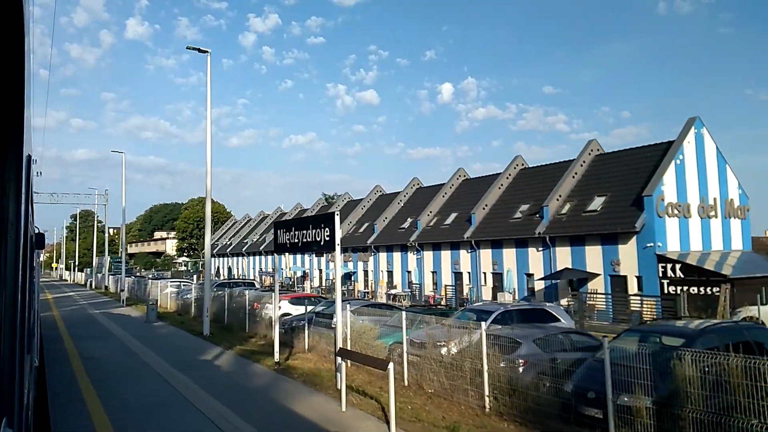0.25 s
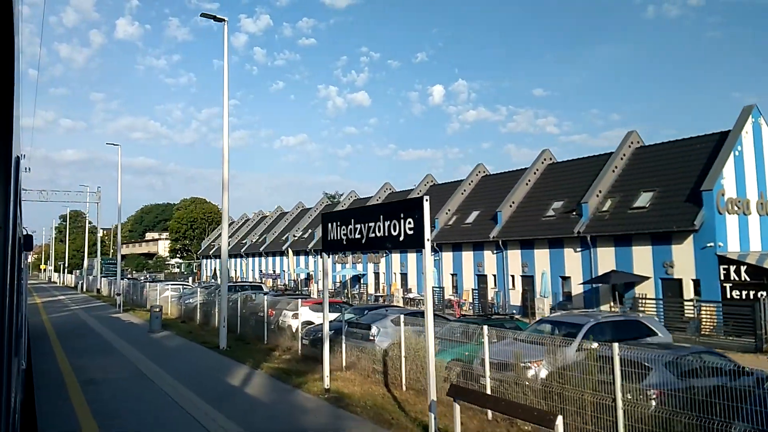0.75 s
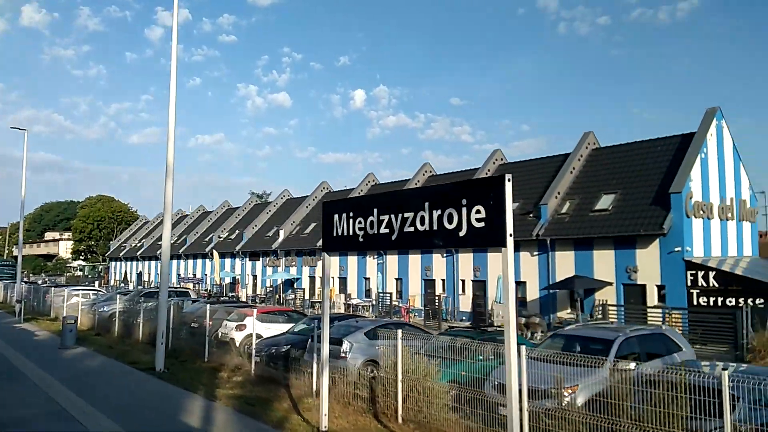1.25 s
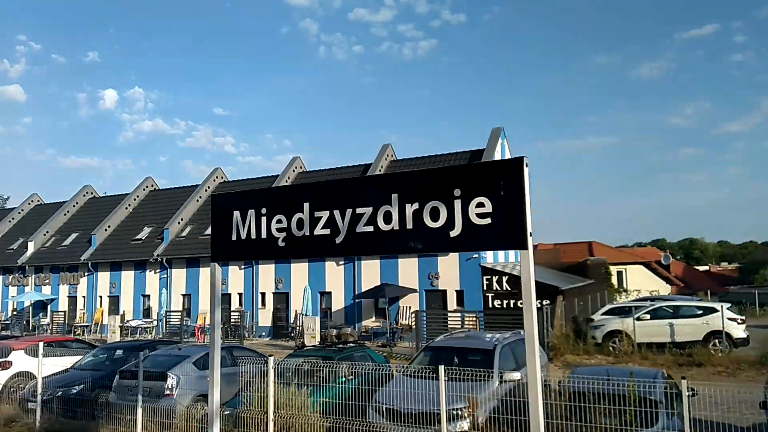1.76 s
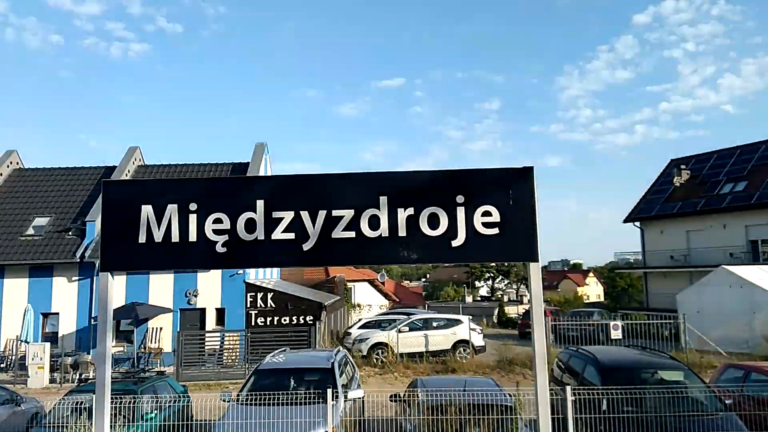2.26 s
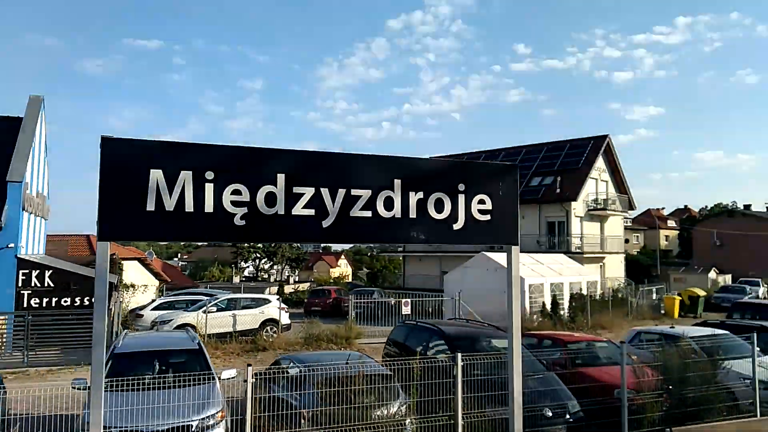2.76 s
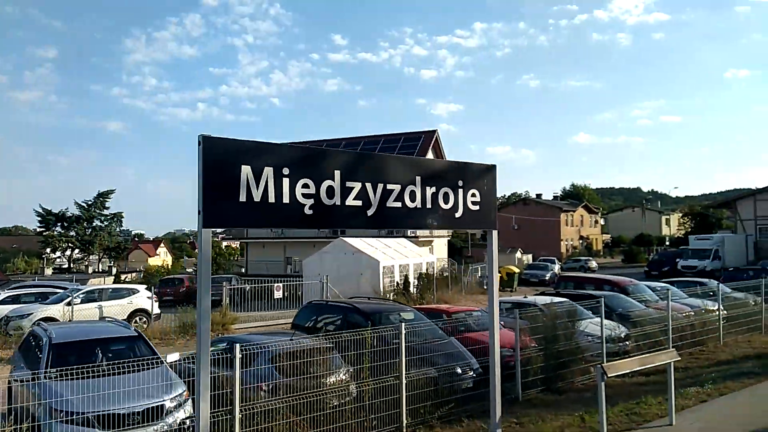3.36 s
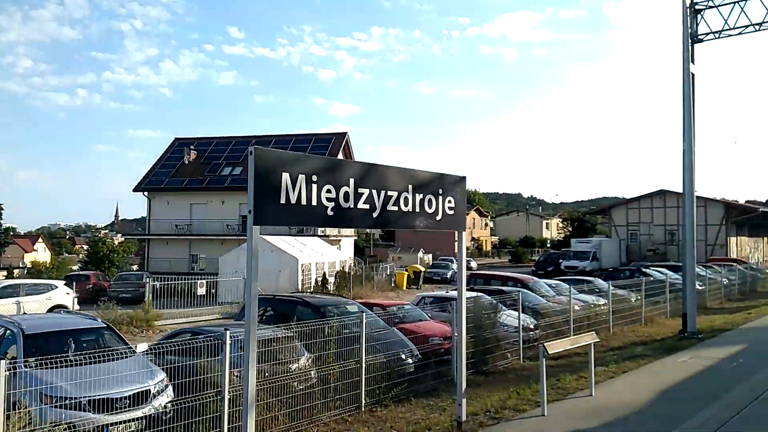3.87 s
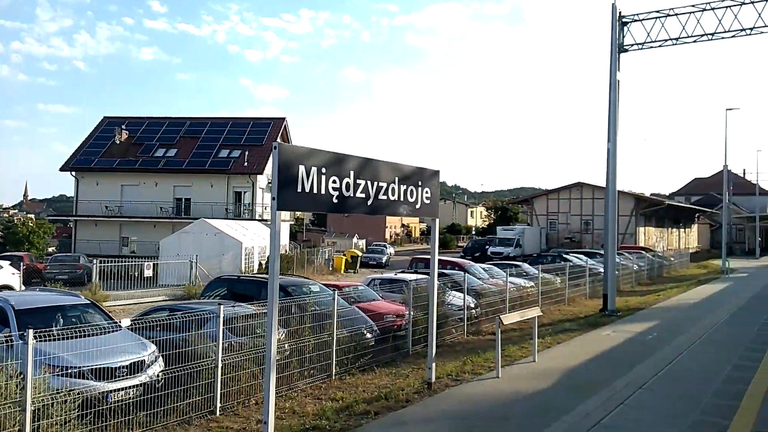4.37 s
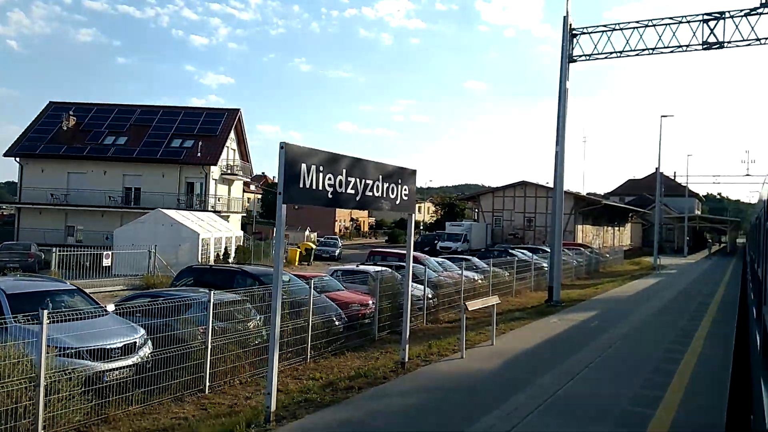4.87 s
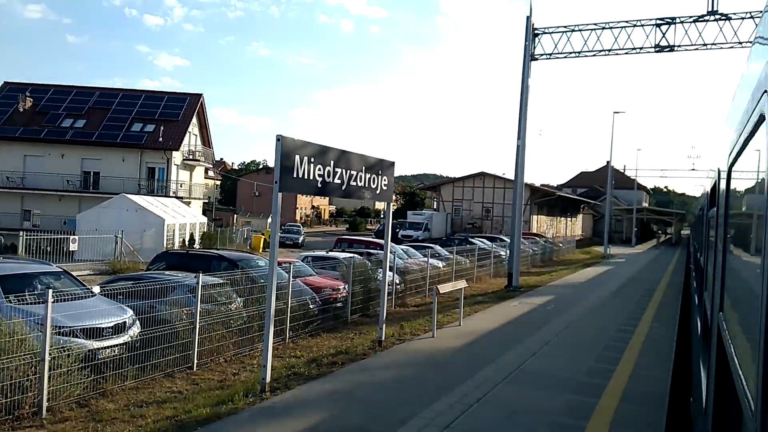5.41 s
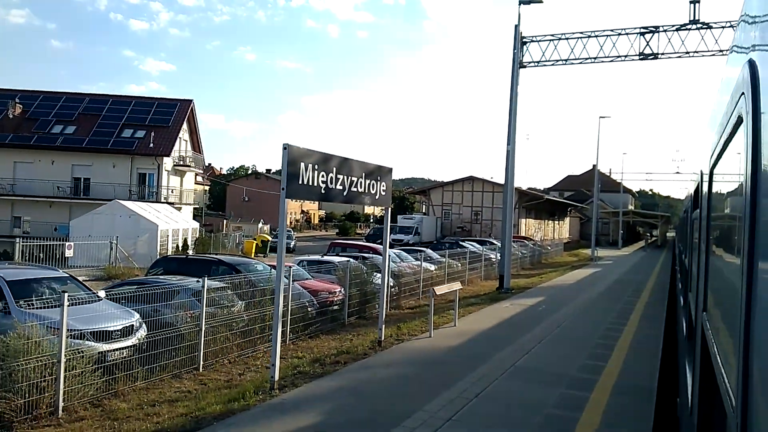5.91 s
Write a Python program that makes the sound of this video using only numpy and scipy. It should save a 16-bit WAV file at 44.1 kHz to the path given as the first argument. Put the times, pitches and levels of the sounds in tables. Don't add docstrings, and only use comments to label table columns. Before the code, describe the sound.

From an open window of a slowing passenger train, rolling roar and low rumble dominate at first, with steel clinks and short hissing brake grabs over a thin, high squeal. The roar fades while the squeal swells into a piercing, wavering scream, flattened by the overloaded phone microphones, still sounding at the end.

```python
import sys
import numpy as np
from scipy import signal
from scipy.fft import next_fast_len
from scipy.io import wavfile
from scipy.ndimage import uniform_filter1d

SR = 44100
rng = np.random.default_rng(int(sys.argv[2]) if len(sys.argv) > 2 else 0)


def waveform_to_disk(signal):
    frames = np.transpose(np.atleast_2d(signal))
    scaled = np.clip(frames, -1, 1) * 32767
    samples = np.round(scaled).astype(np.int16)
    wavfile.write(sys.argv[1], SR, samples)


def gain_from_decibels(decibels):
    exponent = np.asarray(decibels, float) / 20
    return 10 ** exponent


N = 271052
CEILING_DB = -11


def evened(x):
    return x / np.sqrt(np.mean(x ** 2) + 1e-20)


def along(rows, t):
    s, *columns = np.transpose(rows)
    return np.array([np.interp(t, s, c) for c in columns])


def grid(size):
    hop = size // 4
    return np.arange(N // hop + 5) * hop / SR, np.fft.rfftfreq(size, 1 / SR)


def drift(span):
    x = rng.standard_normal((N, 2)).T
    for _ in range(2):
        x = uniform_filter1d(x, span, axis=1)
    return evened(x)


def bumps(events, value):
    t, out = np.arange(N) / SR, np.zeros((2, N))
    for (s, side, _, length), height in zip(events, value):
        near = slice(max(int((s - 2 * length) * SR), 0), int((s + 2 * length) * SR))
        out[int(round(side)), near] += height * np.exp(-np.log(16) * ((t[near] - s) / length) ** 2)
    return out


def noise(gain, same, size):
    a, b, c, d = rng.standard_normal((gain.shape[2], gain.shape[1], 4)).T
    same = np.clip(same, 0, 1)
    left = a + 1j * b
    right = same * left + np.sqrt(1 - same ** 2) * (c + 1j * d)
    z = np.array([left, right]) * gain
    return signal.istft(z, nperseg=size, noverlap=size * 3 // 4)[1][:, :N]


def bed(colour, run, same, patchy_db, flicker_db, edge_db, lift_db, size):
    t, hz = grid(size)
    f, *sides = np.transpose(colour)
    shape_db = np.array([np.interp(np.log(hz + 1), np.log(f), side) for side in sides])
    shape_db -= edge_db * np.maximum(np.log2((hz + 1) / f[-1]), 0)
    shape_db -= edge_db * np.maximum(np.log2(f[0] / (hz + 1)), 0)
    patches = rng.standard_normal((len(t), len(hz))).T
    patches = evened(uniform_filter1d(uniform_filter1d(patches, 12, axis=0), 10, axis=1))
    flicker = evened(uniform_filter1d(rng.standard_normal(len(t)), 3))
    gain_db = shape_db[:, :, None] + patchy_db * patches + flicker_db * flicker
    level_db, pan_db = run
    sides_db = level_db + lift_db + np.array([pan_db, -pan_db]) / 2
    return evened(noise(gain_from_decibels(gain_db), same, size)) * gain_from_decibels(sides_db)


def running_gear(start_db, halving_loss_db, turned_db, turned_pan_db):
    # t/s, speed/0-1 of line speed, phone turned back along the train/0-1
    ride = [
        (0, 0.97, 0),
        (1.5, 0.87, 0),
        (2.6, 0.67, 0.06),
        (3.4, .58, 0.34),
        (4.6, .46, 0.12),
        (5.3, 0.45, 0.59),
        (6.15, 0.35, .99),
    ]
    speed, turned = along(ride, np.arange(N) / SR)
    level_db = start_db + halving_loss_db * np.log2(np.maximum(speed, 0.05)) + turned_db * turned
    return level_db, turned_pan_db * turned


def rumble():
    # f/Hz, left level/dB per Hz, right level/dB per Hz
    colour = [(25, -26, -24), (52, -2.5, 2.5), (95.7, 11, 5), (153, 0.5, -5.5), (263, -1, -10.5),
              (397, -2.5, -13.5), (570, -20, -21.5), (844, -16.5, -22)]
    run = running_gear(start_db=-36.5, halving_loss_db=0, turned_db=-8.5, turned_pan_db=0)
    hz = grid(size=2048)[1][:, None]
    alike = 0.9 - 0.5 / (1 + (hz / 45) ** 4)
    return bed(colour, run, alike, patchy_db=1.3, flicker_db=1.7, edge_db=6.5, lift_db=1.0, size=2048)


def rolling_roar():
    # f/Hz, left level/dB per Hz, right level/dB per Hz
    colour = [(234, -1, -5.5), (510, -6.5, -13.5), (875, -3.5, -11), (1430, -2, -16.5), (1975, 0.9, -21),
              (2730, -9, -23.5), (3660, -15.5, -23.5), (5260, -32.5, -65), (5820, -25, -26.5)]
    run = running_gear(start_db=-28, halving_loss_db=14.5, turned_db=6, turned_pan_db=-12)
    hz = grid(size=512)[1][:, None]
    alike = 1.03 / (1 + (hz / 1100) ** 2)
    roar = bed(colour, run, alike, patchy_db=0.9, flicker_db=0.42, edge_db=21, lift_db=4.0, size=512)
    roar[0] = np.roll(roar[0], 9)
    return roar


def rattles():
    # t/s, peak level/dB, t60/s
    bursts = [
        (0.1795, -39, 0.08),
        (0.3237, -36, 0.072),
        (0.4893, -40, 0.099),
        (0.5965, -31, 0.068),
        (0.7292, -36, 0.08),
        (1.3957, -29, 0.087),
        (1.5524, -29, 0.079),
        (1.555, -27, 0.024),
        (1.8542, -32, 0.08),
        (2.5052, -45, 0.08),
    ]
    # f/Hz, width/Hz, level/dB
    modes = [(5900, 640, -13), (7530, 570, 6), (8460, 460, -0.5), (11000, 1600, -6)]
    t = np.arange(N) / SR
    envelope = gain_from_decibels(-44.0 - 4.9 * t + 1.9 * drift(900)[0])
    for s, peak_db, t60 in bursts:
        attack = np.clip((t - s) / 0.003, 0, 1)
        envelope = envelope + gain_from_decibels(peak_db - 8.5 - 60 * np.maximum(t - s, 0) / t60) * attack
    frames, hz = grid(size=256)
    colour = sum(gain_from_decibels(db) / (1 + (2 * (hz - f_hz) / width) ** 2) for f_hz, width, db in modes)
    sides = gain_from_decibels(np.array([-8.5, 0]))[:, None, None]
    gain = colour[None, :, None] * sides * np.ones(len(frames))
    return evened(noise(gain, 0.14, size=256)) * envelope


def brake_rub():
    # f/Hz, left level/dB per Hz, right level/dB per Hz
    colour = [(1500, -8, -14), (2800, -1, -11), (3600, -4, -6), (4100, 0, 0), (4900, -2, -1),
              (5300, -12, -10), (6200, -13, -9), (7400, -15, -7), (8200, -15, -5), (9600, -12, -7),
              (10400, -16, -12), (12400, -12, -16), (14000, -15, -25)]
    # t/s, level/dB
    contact = [(0, -51.5), (.36, -49), (.4, -68), (1.2, -52.5), (2.1, -53.5), (2.42, -51), (2.55, -45),
               (3.4, -40.5), (4.4, -43), (5.3, -38.5), (5.68, -43.5), (5.85, -41.5), (6.05, -43),
               (6.15, -49)]
    # t/s, peak level/dB
    grabs = [
        (.5, -51),
        (.6, -56),
        (.77, -53),
        (.93, -51.5),
        (1.09, -64),
        (1.19, -66),
        (1.4, -56),
        (1.55, -47.5),
        (1.86, -48.5),
        (2.11, -50.5),
    ]
    rise_s, fall_db_per_s = 0.015, 120
    t = np.arange(N) / SR
    level = gain_from_decibels(along(contact, t)[0])
    for s, peak_db in grabs:
        swell = np.clip(1 + (t - s) / rise_s, 0, 1)
        level = level + gain_from_decibels(peak_db - fall_db_per_s * np.maximum(t - s, 0)) * swell
    run = 20 * np.log10(level), np.zeros(N)
    return bed(colour, run, same=0.041, patchy_db=2.0, flicker_db=0.0, edge_db=45, lift_db=9.5, size=512)


def partials(table, hz, mode_hz, spread, level_db):
    total = 0
    for multiple, left_db, right_db, blur in table:
        sides_db = np.array([left_db, right_db])[:, None, None]
        distance_hz = abs(hz[:, None] - multiple * mode_hz)
        total = total + gain_from_decibels(sides_db + level_db - spread / blur * distance_hz / 100)
    return total


def squeal():
    # t/s, left level/dB, right level/dB
    drive = [(0.0, -33, -38), (0.6, -28, -36), (0.9, -28.5, -37), (1.2, -24, -30.5), (1.5, -29.5, -33.5),
             (1.8, -25.5, -30), (2.4, -21.5, -24), (2.7, -21.5, -25), (3.0, -20.5, -27.5),
             (3.3, -15.5, -20), (3.6, -18, -14.5), (3.9, -16.5, -18.5), (4.4, -14, -17.5), (4.8, -20, -17),
             (5.2, -11.5, -18.5), (5.7, -19.5, -15), (6.0, -15.5, -10), (6.15, -20.5, -16)]
    # t/s, pitch fall-off/dB per 100 Hz, narrow core level/dB, overtone level/dB
    braking = [(0, 12.5, -7.5, -19.5), (1.5, 11, -3, -24.5), (2.4, 14.5, -6, -35), (3.0, 6.5, 3, -18),
               (3.8, 16.5, 4, -19), (4.5, 13.5, 5, -17.5), (5.0, 13.5, 4, -15), (5.6, 22, 6, -19.5),
               (6.15, 26.5, 15.5, -15.5)]
    # t/s, f/Hz
    disc_mode = [(0, 4500), (1.5, 4497), (2.5, 4485), (3.1, 4464), (3.9, 4464), (4.6, 4456), (5.1, 4450),
                 (6.15, 4456)]
    # multiple of the disc mode, left level/dB, right level/dB, blur factor
    half_mode = [
        (.5, 0, -9, 0.49),
        (.5, -4.5, -17, 4.45),
        (1.5, -14, -10.5, 1.27),
        (1.5, -29, -17, 8.7),
    ]
    overtones = [
        (2, -13, -2.5, 1.96),
        (2, -27, -13, 5),
        (3, -16.5, -24.5, 1.4),
        (3, -23, -30, 6.9),
    ]
    # t/s, level/dB
    half_growth = [(0, -69), (2.8, -57), (3.6, -43.5), (3.95, -40.5), (4.3, -45.5), (4.75, -41.5),
                   (5.02, -36.5), (5.45, -35), (5.65, -39), (6.1, -37), (6.15, -41)]
    # t/s, microphone (0 left, 1 right), level over the ceiling/dB, length/s
    surges = [(3.148, 0, 13, 0.0067), (3.464, 0, 18, 0.0083), (4.077, 0, 11, 0.014), (4.27, 1, 6, 0.012),
              (4.391, 0, 7, 0.0051), (4.419, 1, 10, 0.0092), (4.549, 1, 10, 0.013), (4.64, 0, 5, 0.027),
              (4.677, 1, 9.5, 0.014), (4.772, 0, 10, 0.013), (4.773, 1, 13, 0.019), (4.86, 0, 8, 0.045),
              (4.931, 0, 11, 0.067), (5.004, 1, 9.5, 0.034), (5.086, 1, 9.5, 0.077), (5.144, 0, 19, 0.017),
              (5.171, 1, 16.5, 0.016), (5.255, 1, 5, 0.086), (5.257, 0, 17, 0.067), (5.345, 1, 13, 0.027),
              (5.36, 0, 5.5, 0.054), (5.401, 1, 10.5, 0.056), (5.457, 0, 13, 0.014), (5.512, 1, 10, 0.031),
              (5.552, 0, 16, 0.053), (5.671, 1, 17.5, 0.085), (5.777, 0, 15.5, 0.053), (5.912, 0, 6.5, 0.1),
              (6.027, 0, 9, 0.03), (6.112, 1, 16, 0.021)]
    # t/s, microphone (0 left, 1 right), depth/dB, length/s
    lulls = [(0.04, 0, 15, 0.024), (2.266, 1, 7, 0.043), (2.423, 0, 12, 0.018), (2.477, 1, 10, 0.011),
             (3.066, 0, 4, 0.015), (3.336, 0, 3, 0.036), (3.785, 0, 13, 0.013), (4.001, 0, 20, 0.033),
             (4.204, 1, 8, 0.0087), (4.596, 0, 13, 0.017), (4.642, 1, 18, 0.0069), (4.738, 0, 18, 0.0097),
             (4.972, 1, 11, 0.02), (5.283, 1, 6, 0.016), (5.316, 0, 7, 0.042), (5.664, 0, 20, 0.005),
             (4.872, 0, 11, .006), (5.008, 0, 8, .008), (5.05, 0, 8, 0.0073), (5.088, 0, 13, 0.0074),
             (5.635, 0, 12, .008), (5.865, 0, 8, 0.0091), (6.061, 0, 14, .014), (5.111, 1, 11, 0.0069),
             (5.379, 1, 8, .006), (5.479, 1, 12, .007), (5.597, 1, 14, 0.011), (5.7, 1, 7, 0.0057),
             (5.861, 1, 12, .012), (2.425, 1, 9, 0.022)]
    surge_db, lull_db = np.array(surges)[:, 2], np.array(lulls)[:, 2]

    frames, hz = grid(size=4096)
    mode_hz = along(disc_mode, frames)[0]
    spread, core_db, over_db = along(braking, frames)
    main = partials([(1, 0, 0, 1)], hz, mode_hz, spread, 0)
    main = main + partials([(1, 0, 0, 0.25)], hz, mode_hz, spread, core_db)
    power = np.sqrt(np.mean(main[0] ** 2, axis=0))
    many = noise(main / power, 0.22, size=4096)
    half = noise(partials(half_mode, hz, mode_hz, spread, 0), 0.054, size=4096)
    over = noise(partials(overtones, hz, mode_hz, spread, over_db) / power, 0.05, size=4096)

    t = np.arange(N) / SR
    drive_db = along(drive, t)
    tone_hz = along(disc_mode, t)[0] + 5.0 * drift(1500)[0] + 3.0 * drift(2500)
    tone = np.sin(2 * np.pi * np.cumsum(tone_hz, axis=1) / SR)
    steady = gain_from_decibels(drive_db + along(braking, t)[1] - 9.5)
    lock = steady + bumps(surges, gain_from_decibels(CEILING_DB - 5.0 + surge_db))
    lull = gain_from_decibels(-bumps(lulls, 1.7 * lull_db))
    wheels = (evened(many) * gain_from_decibels(drive_db + 2.0) + tone * lock) * lull

    choke_db = 0.3 * bumps(surges, surge_db)[0]
    half = evened(half) * gain_from_decibels(along(half_growth, t) + 7.5 - choke_db)
    grip = gain_from_decibels(drive_db.mean(0) + 4.5) / np.std(many)
    return wheels + half + over * grip * gain_from_decibels(1.5 * drift(630)[0])


def scene():
    return rumble() + rolling_roar() + rattles() + brake_rub() + squeal()


def limiter(dry):
    envelope_db = 20 * np.log10(abs(signal.hilbert(dry, next_fast_len(N))[:, :N]) + 1e-9)
    fall = np.arange(N) * 1100.0 / SR
    held_db = np.maximum.accumulate(envelope_db + fall, axis=1) - fall
    over_db = uniform_filter1d(np.maximum(held_db - CEILING_DB, 0), size=40, axis=1)
    low = signal.oaconvolve(dry, signal.firwin(255, 5150, fs=SR)[None], "same")
    treble = dry - low
    treble_db = np.array([[0.32, 0.44], [0.011, 0.83]]) @ over_db
    low -= uniform_filter1d(low, size=1100, axis=1)
    return low * gain_from_decibels(-over_db) + treble * gain_from_decibels(-treble_db)


def thinned_treble(x):
    # t/s, threshold against the local mean/dB
    starved = [(0, -1), (2.4, -.2), (3.6, 2), (4.7, 2.5), (4.95, -2), (6.15, -3.5)]
    hz, t, z = signal.stft(x, SR, nperseg=2048, noverlap=1024)
    power, hz = abs(z) ** 2, hz[:, None]
    band_db = 10 * np.log10(uniform_filter1d(power, size=16, axis=1) + 1e-20)
    shade = (hz > 4950) & (hz < 6300)
    local_db = uniform_filter1d(band_db[:, shade[:, 0]].mean(1, keepdims=True), size=25, axis=2)
    patchy = shade & (band_db < local_db + along(starved, t) + 0.5)
    fine = uniform_filter1d(power, size=4, axis=1)
    around = uniform_filter1d(uniform_filter1d(power, size=12, axis=1), size=9, axis=2)
    faint = (hz > 6300) & (fine < 0.5 * around)
    both_db = band_db.mean(0)
    usual_db = uniform_filter1d(uniform_filter1d(both_db, size=5, axis=1), size=70, axis=0)
    sparse = (hz > 9700) & (both_db < usual_db - 1.9)
    jitter = rng.standard_normal((1, len(t))).clip(-2, 1.5)
    top = hz > 14420 - 75 * t + 150 * jitter
    kept = np.where(patchy | faint | sparse | top, 0.002, 1)
    return signal.istft(z * kept, nperseg=2048, noverlap=1024)[1][:, :N]


def roll_off(x):
    return signal.sosfilt(signal.butter(12, 14430, fs=SR, output="sos"), x)


def record(dry):
    mix = thinned_treble(limiter(dry))
    return roll_off(mix)


dry = scene()
out = record(dry)
waveform_to_disk(out)
```